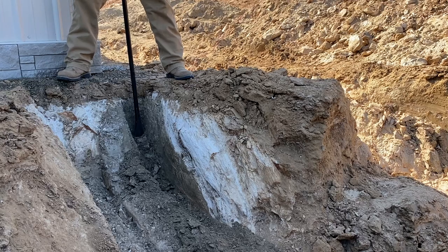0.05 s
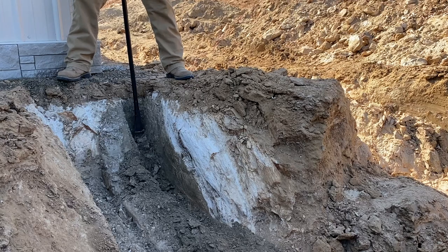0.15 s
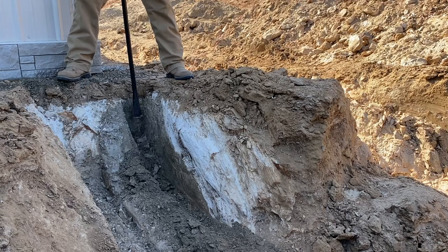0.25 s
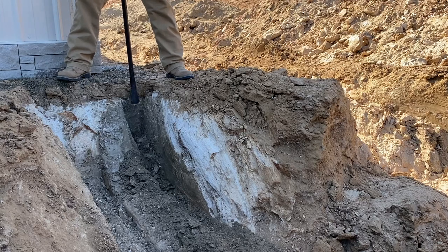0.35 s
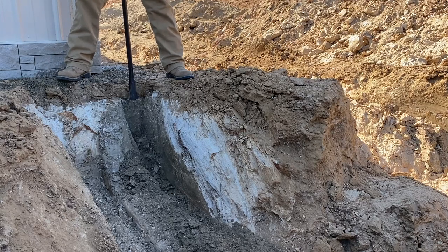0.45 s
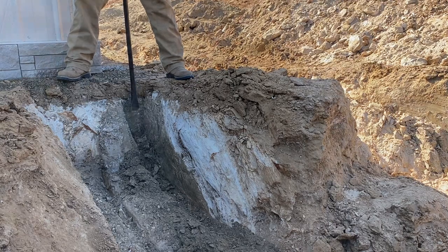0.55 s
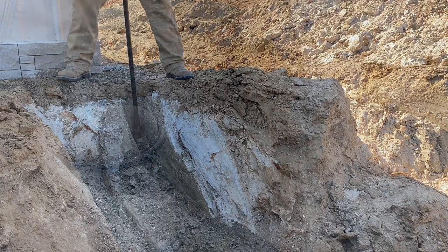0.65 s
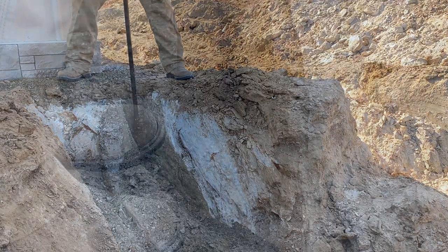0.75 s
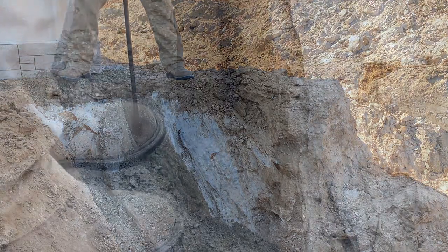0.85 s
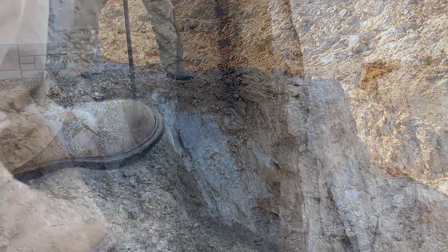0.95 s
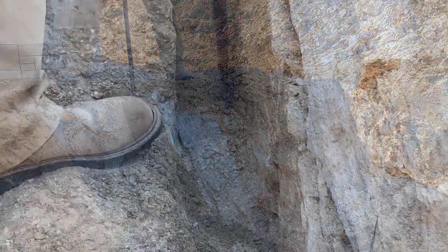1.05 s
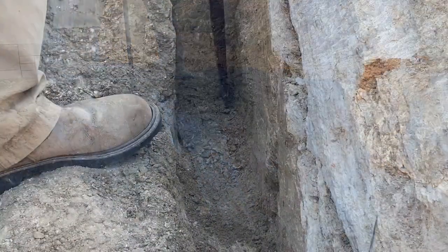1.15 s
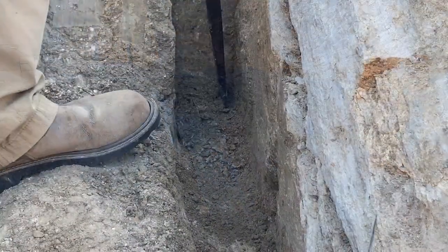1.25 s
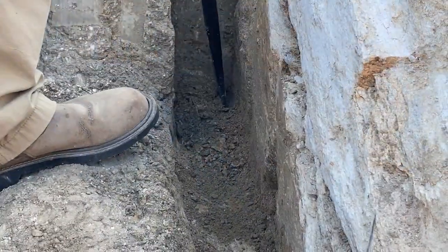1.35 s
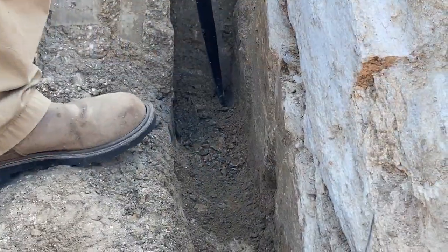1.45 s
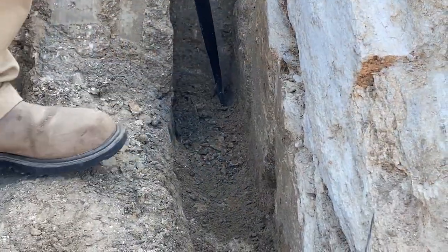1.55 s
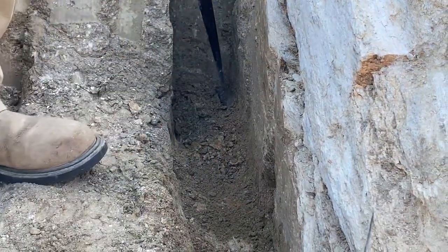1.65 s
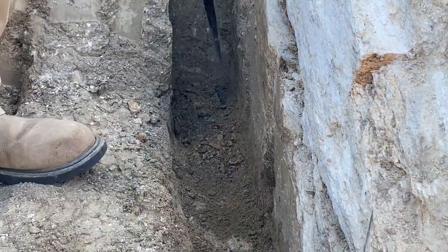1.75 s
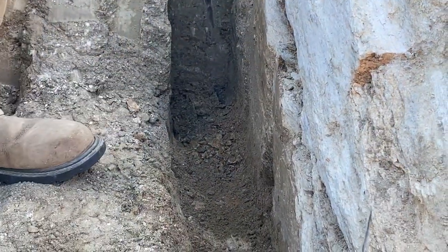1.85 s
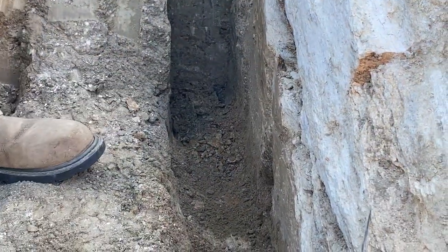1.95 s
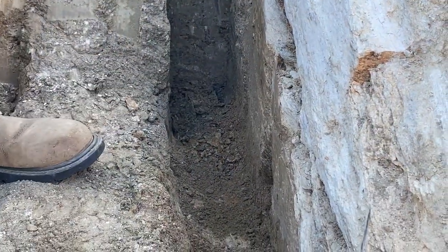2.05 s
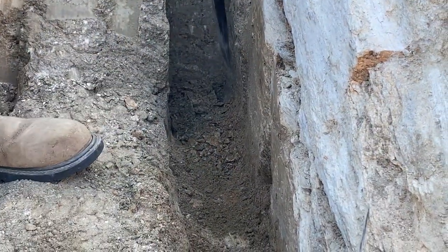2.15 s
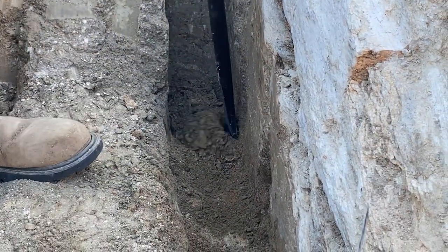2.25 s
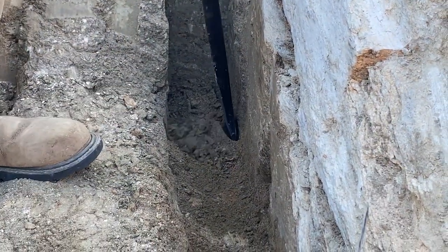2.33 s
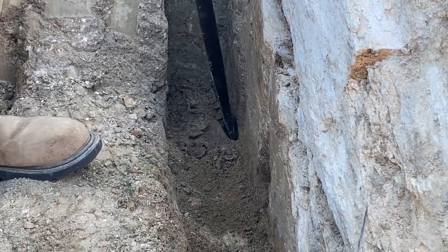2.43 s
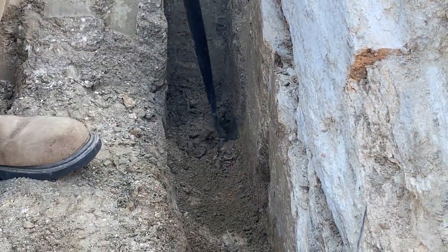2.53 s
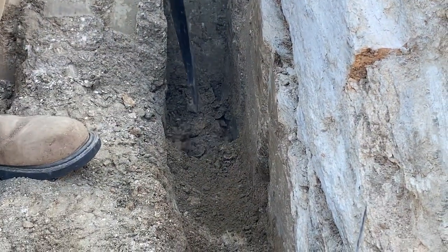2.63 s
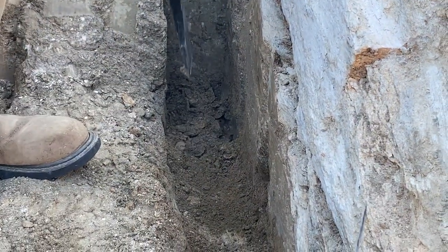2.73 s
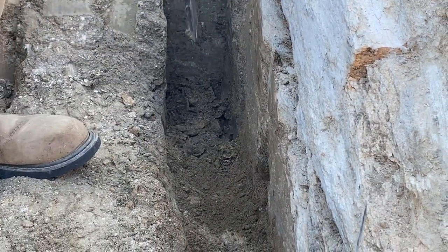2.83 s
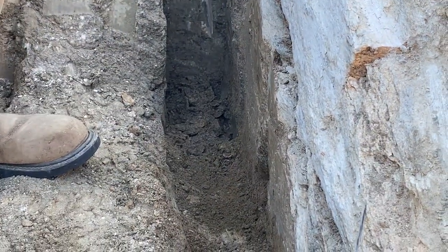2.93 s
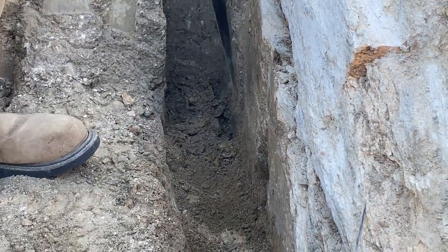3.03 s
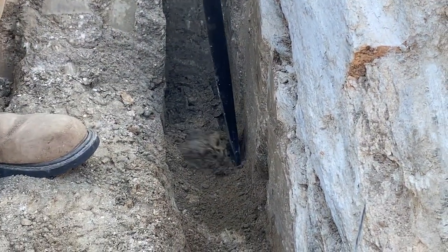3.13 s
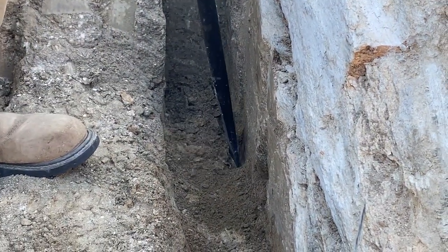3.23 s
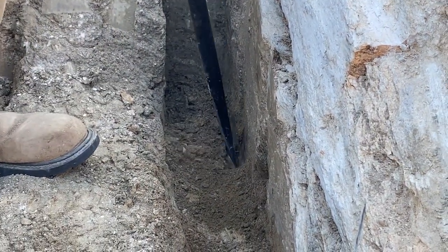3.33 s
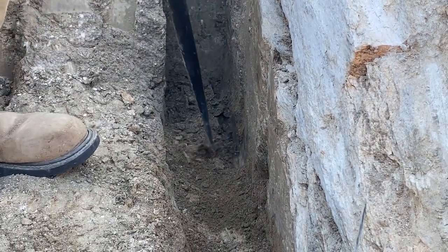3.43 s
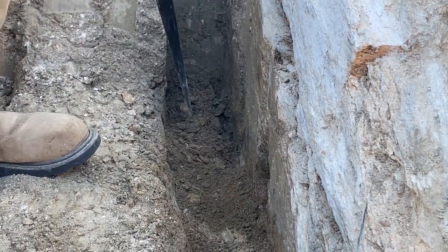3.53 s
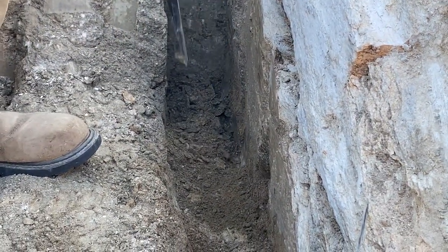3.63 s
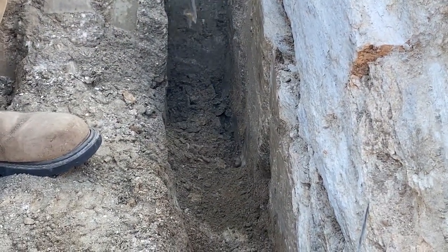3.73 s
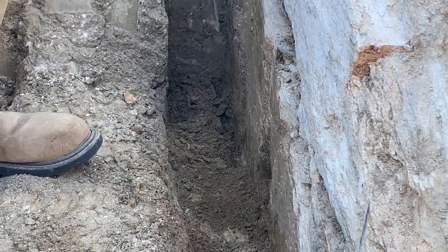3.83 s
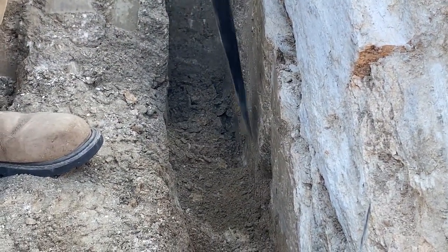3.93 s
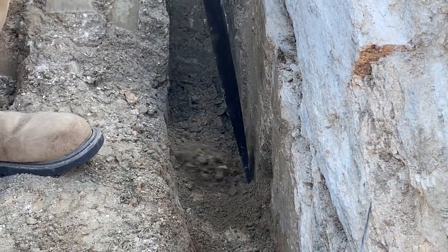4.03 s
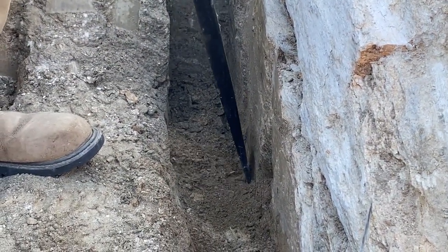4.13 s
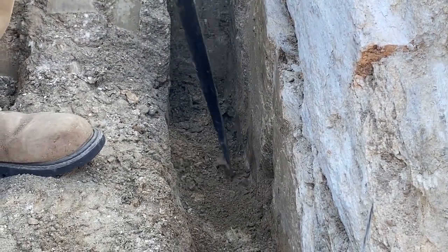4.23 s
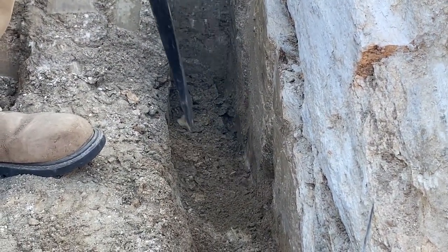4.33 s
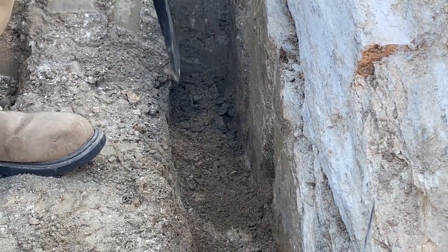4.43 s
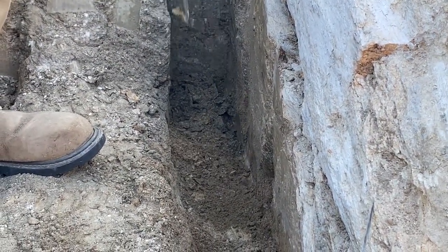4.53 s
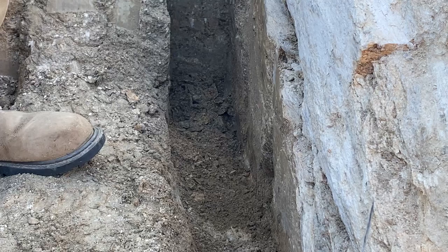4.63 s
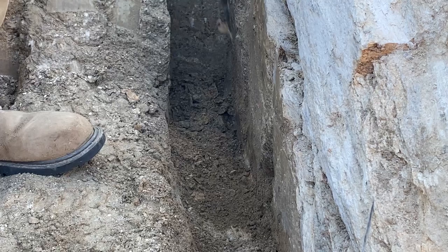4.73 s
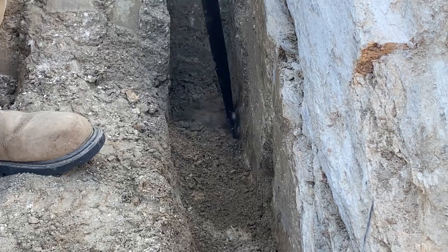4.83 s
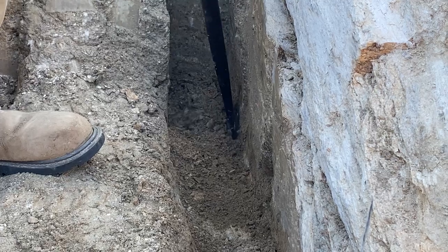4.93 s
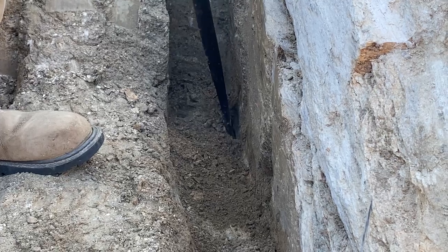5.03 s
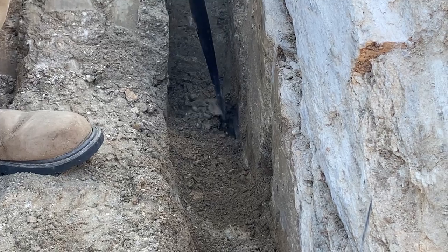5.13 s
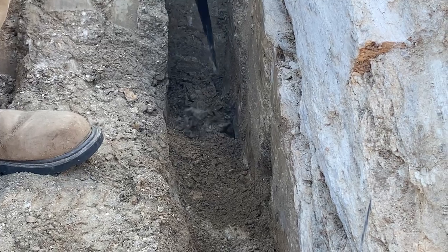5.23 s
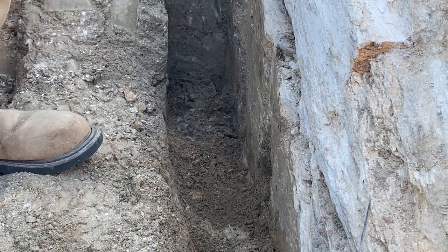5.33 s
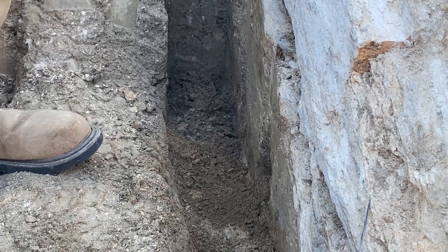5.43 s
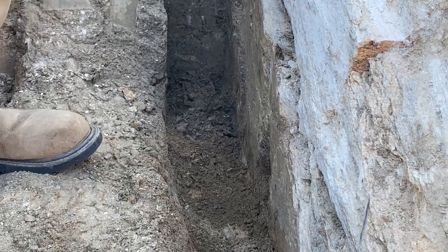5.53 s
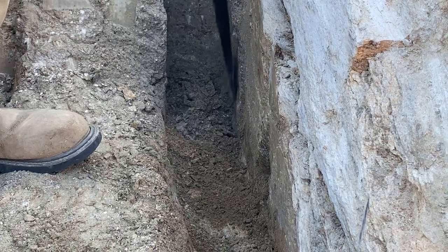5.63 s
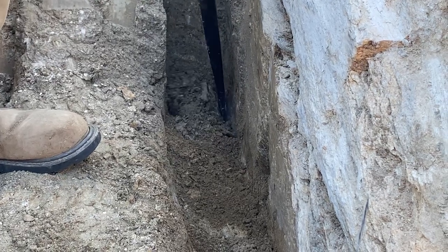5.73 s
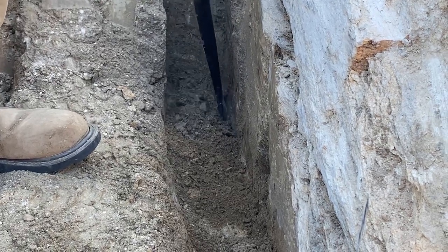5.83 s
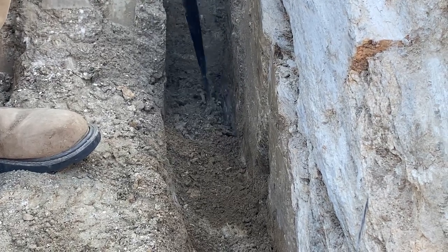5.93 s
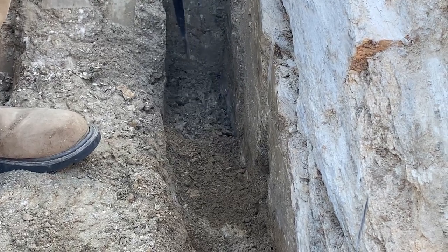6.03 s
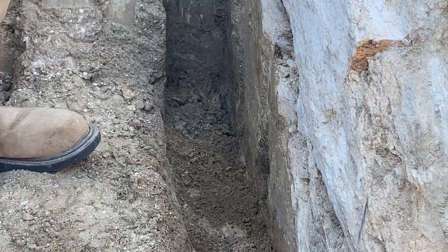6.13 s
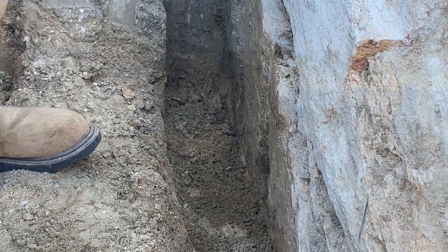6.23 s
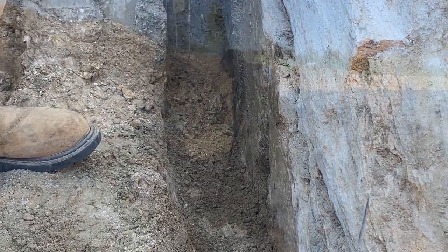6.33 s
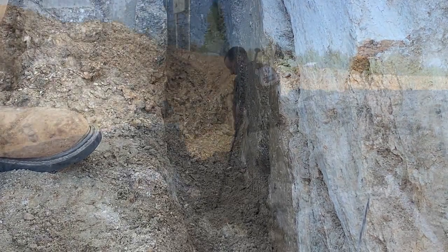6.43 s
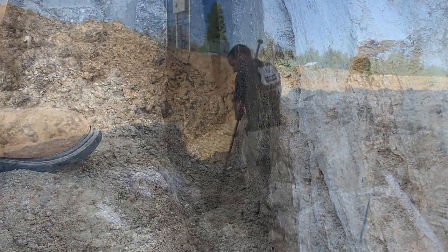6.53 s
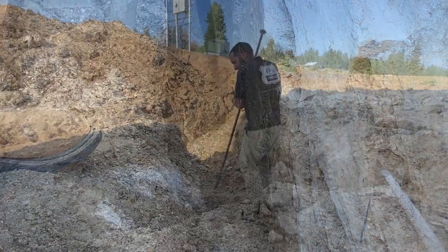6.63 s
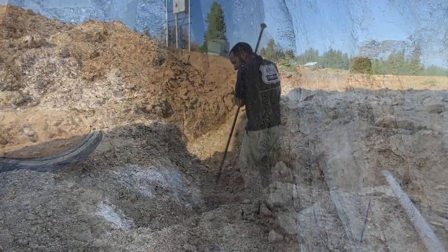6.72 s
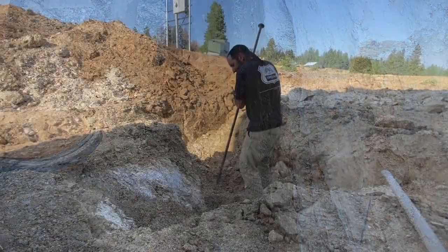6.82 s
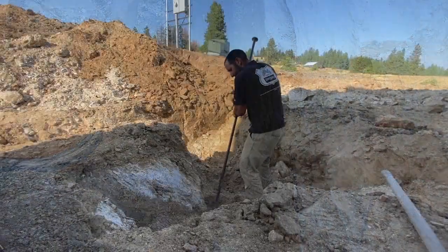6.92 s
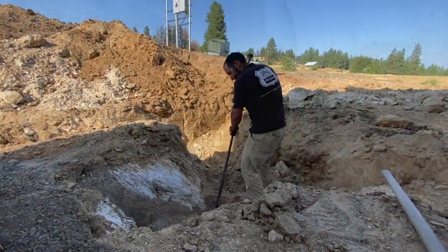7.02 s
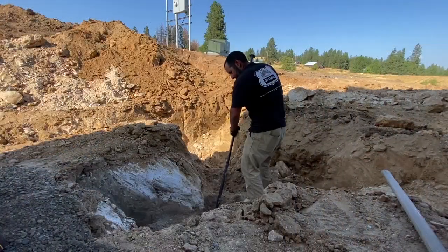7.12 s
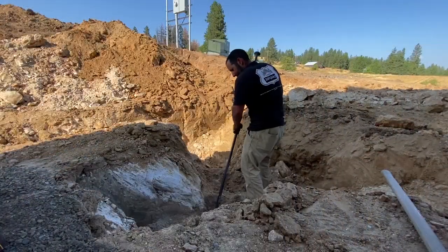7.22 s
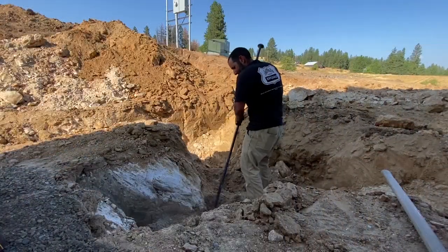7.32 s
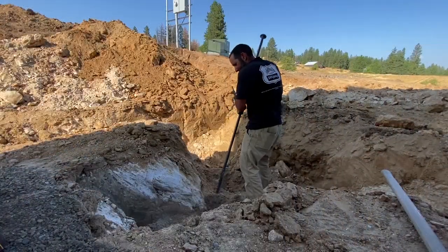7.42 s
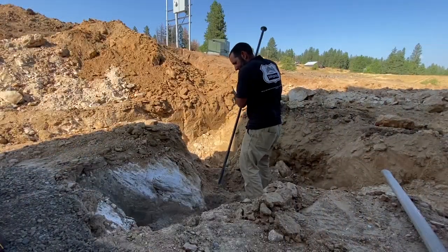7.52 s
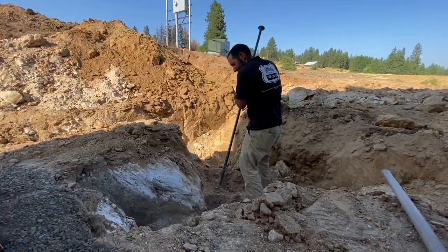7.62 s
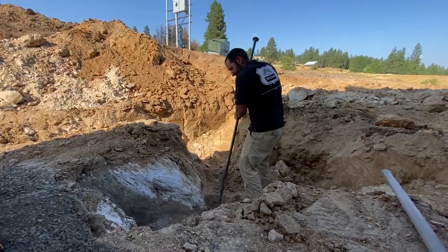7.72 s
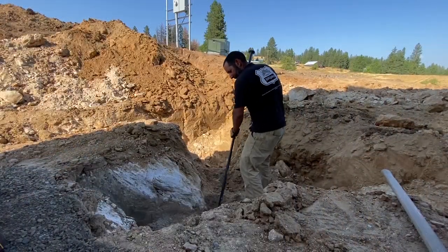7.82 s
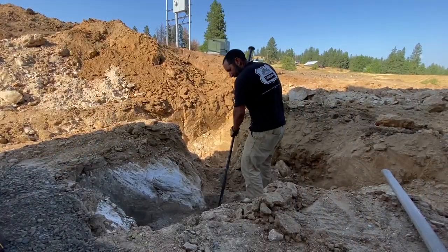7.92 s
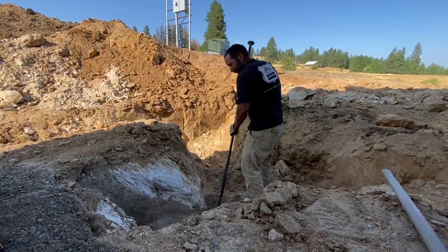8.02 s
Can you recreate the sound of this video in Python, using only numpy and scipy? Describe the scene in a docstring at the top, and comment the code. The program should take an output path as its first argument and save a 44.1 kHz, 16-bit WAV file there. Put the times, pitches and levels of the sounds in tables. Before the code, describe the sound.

Nine slow, hard blows of a heavy metal bar crack stone and thump soil, with brief clinks, falling grit and light wind.

```python
"""In a rocky trench outdoors, a long steel digging bar is driven nine times into the bottom.
Fracture: the tip bites through grit and cracks the stone, each a burst of random grains through a filter.
Resonance: the fractures excite damped bending and lengthwise modes of the bar; the ground thuds and thumps
with falling tones. Filtered grains trickle back as crumbs, over light wind and a faint hush of noise.
The first blow and the last two are heard from a few steps aside, the others from just above the trench."""
import sys
import numpy as np
from scipy import signal
from scipy.fft import rfft, irfft, next_fast_len
from scipy.io import wavfile
from scipy.ndimage import uniform_filter1d

SR = 44100
rng = np.random.default_rng(int(sys.argv[2]) if len(sys.argv) > 2 else 0)


def master_out(mix):
    """Clip the mix to full scale and print it as 16-bit PCM to the path in sys.argv[1]."""
    frames = np.transpose(np.atleast_2d(mix))
    ceiling = np.clip(frames, -1, 1)
    pcm = np.round(ceiling * 32767).astype(np.int16)
    wavfile.write(sys.argv[1], SR, pcm)


N = 355887   # samples in the scene
SIZE = 2 ** 15   # samples in a short sound
AGE = np.arange(SIZE) / SR - .1   # s from the onset of a short sound

# ring that the tip allows: deep in the trench, and at the shallow spots heard from the side
BURIED_T60_S, SHALLOW_T60_S = 0.035, 0.052
RATTLE_T60_S = 0.13   # decay of the force of every rattle
RATTLE_RING_DB, RATTLE_LENGTHWISE_DB = 5, -6.5   # relative to the rattle's crunch

# steel meets stone: (time [s], crack level [dB], rise [s], force t60 [s], brightness [dB/octave],
# bending ring level [dB], lengthwise ring level [dB])
CRACKS = [(0.645, -22.5, 0.0058, 0.022, -0.5, -51.5, -33.5), (2.239, -29, 0.0028, 0.062, -0.5, -48, -52),
          (3.12, -19.5, 0.0023, 0.026, -1, -26, -42), (3.988, -26, 0.0013, 0.028, 1, -31, -50.5),
          (4.829, -23.5, 0.0033, 0.042, 3, -14, -33), (4.846, -25.5, 0.004, 0.037, 1.5, -32.5, -42.5),
          (5.664, -28, 0.00092, 0.03, 7, -18, -37), (5.678, -23.5, 0.0039, 0.036, 0.5, -36.5, -40),
          (6.517, -23, 0.0051, 0.019, 0.5, -28.5, -49.5), (7.015, -20.5, 0.0086, 0.14, -1, -25.5, -43),
          (7.808, -27.5, 0.0012, 0.13, 0, -39, -34)]
# the bar rebounds and rattles on the rock: (time [s], crunch level [dB], rise [s], loose tip's t60 limit [s])
RATTLES = [(0.686, -45, 0.0016, 0.17), (7.086, -46.5, 0.02, 0.1), (7.177, -59.5, 0.011, 1.2),
           (7.26, -64, 0.02, 0.55)]


def bar_on_stone():
    """Impact excitation: the bar cracks the stone; the deeper its tip is buried, the more its ring is damped."""
    out = np.zeros((2, N))
    for s, *blow in CRACKS:
        tip_t60 = BURIED_T60_S + shallow_at(s) * (SHALLOW_T60_S - BURIED_T60_S)
        add(out, s, contact(s, *blow, tip_t60))
    for s, db, rise, tip_t60 in RATTLES:
        ring_db, lengthwise_db = db + RATTLE_RING_DB, db + RATTLE_LENGTHWISE_DB
        add(out, s, contact(s, db, rise, RATTLE_T60_S, 0, ring_db, lengthwise_db, tip_t60))
    return out


SPOIL_DB, SPOIL_T60_S = -17, 0.14   # tail of each crack off the heaps of spoil; gain before filtering
SLAB_HZ, SLAB_T60_S, SLAB_DB = 1400, 0.0018, -3   # hard clack of the bare slab, relative to the crack
SHALLOW_DETUNE = .989   # a tip held less firmly lowers the bending modes

# spectrum of breaking stone: (frequency [Hz], density [dB per Hz])
STONE = [(150, -15.5), (400, 0), (1500, -5.5), (3000, -11), (7200, -19), (8500, -26), (10300, -16.5),
         (11900, -40), (14000, -35.5), (16000, -51)]
# bending modes of the bar: (frequency with the tip deep [Hz], level from above the trench [dB],
# level from the side [dB], t60 with the tip free [s])
BENDING = [(1196, -6, -4, .1), (1803, -9, -3, .07), (2020, -9, 3, .15), (2290, -3, -7, .15),
           (2697, 3, -2, .15), (3043, 0, -12, .15), (3446, 0, -7, .25), (3900, -2, 0, 1.1),
           (4356, -8, -7, .2), (4620, -5, -18, .15), (4790, -4, -12, .2), (4890, -17, -4, .22),
           (5390, -3, -3, .11), (5948, -17, -6, .17), (6243, -14, -6, .15), (6400, -7, -10, .17),
           (9700, -25, -10, .16)]
# lengthwise modes of the bar: (frequency [Hz], level [dB], t60 [s])
LENGTHWISE = [(1412, -2, .11), (2825, 2, .2), (4226, -7, .095), (5635, -5, .1), (7063, -3, .14),
              (9950, -13, .09)]


def contact(s, db, rise, t60, bright_db, ring_db, lengthwise_db, tip_t60):
    """Modal superposition: a burst of fractures drives the bar's modes; the tip damps the bending ones."""
    shallow = shallow_at(s)
    force = grains(SIZE) * swell(rise, t60)
    scatter = from_db(SPOIL_DB) * grains(SIZE) * swell(rise, SPOIL_T60_S)
    crack = crest_one(colour(trench(force, echo_db=-7.0) + scatter, STONE, bright_db))
    slab = crest_one(ring(force, SLAB_HZ, SLAB_T60_S))
    crack = crack + shallow * from_db(SLAB_DB) * slab
    bending = 0
    for hz, above_db, aside_db, free_t60 in BENDING:
        level_db = above_db + shallow * (aside_db - above_db)
        damped_t60 = 1 / (1 / free_t60 + 1 / tip_t60)   # loss rates add
        bending = bending + from_db(level_db) * mode(force, hz * SHALLOW_DETUNE ** shallow, damped_t60)
    lengthwise = sum(from_db(level) * mode(force, hz, decay) for hz, level, decay in LENGTHWISE)
    ringing = from_db(ring_db) * crest_one(bending) + from_db(lengthwise_db) * crest_one(lengthwise)
    return spread(from_db(db) * crack + ringing, off_axis_at(s))


def mode(force, hz, t60):
    """Energy storage: a mode sums the fractures' energy, rings it out, and has its phase jolted by them."""
    push = force[0] / np.sqrt(np.sum(force[0] ** 2))
    energy_kept = from_db(-60 / (t60 * SR)) ** 2   # share kept per sample
    energy = signal.lfilter([1], [1, -energy_kept], push ** 2 + 1e-18)
    phase = 2 * np.pi * (hz * AGE + rng.random((2, 1))) + np.cumsum(push)
    return np.sqrt(energy) * np.sin(phase)


def trench(x, echo_db):
    """Early reflection: the close rock walls throw the sound back three times within a few milliseconds."""
    lags = rng.uniform(.001, 0.004, size=3)   # s
    return x + sum(from_db(echo_db) * np.roll(x, round(lag * SR), axis=-1) for lag in lags)


def squeak(s, hz, db):
    """Frictional excitation: steel skids over stone, noise through two equal resonances in series."""
    out = np.zeros((2, N))
    friction = rng.standard_normal(SIZE) * swell(0.00049, 0.03)
    skid = ring(friction, hz, 0.0072)
    add(out, s, from_db(db) * crest_one(ring(skid, hz, 0.0072)))
    return out


KNOCK_HZ, KNOCK_LEAD_S = 607, .007   # lower knock resonance; the knock comes just before the thud
KNOCK_RISE_S, KNOCK_T60_S = 0.0074, 0.023
THUD_SAG_OCT_PER_S, THUD_NOISE_DB = 65, -2   # pitch drop of the thud; crunch of soil within it
THUMP_LAG_S = 0.0026   # the thump follows the thud
BUMP_RISE_CYCLES, BUMP_T60_CYCLES = 0.81, 3.6   # a bump swells and fades within a few cycles
BUMP_SAG_OCT_PER_S = 2

# the ground stops the bar: (time [s], knock level [dB], thud level [dB], thud pitch at onset [Hz],
# thump level [dB], spilled earth level [dB], spill length [s])
BLOWS = [(0.654, -31, -26.5, 210, -29, -72, 0.96), (2.25, -28, -25, 215, -27.5, -68.5, 0.43),
         (3.132, -21, -30.5, 231, -33, -71.5, 0.73), (4, -21, -25.5, 170, -26, -68, 0.19),
         (4.859, -28.5, -22.5, 224, -28, -63.5, 0.14), (5.685, -24.5, -20, 238.7, -38.5, -68, 0.16),
         (6.525, -22, -27.5, 265.2, -36, -69, 0.026), (7.024, -27.5, -20, 175, -37, -76, 0.18),
         (7.805, -36.5, -28, 199, -35.5, -70.5, 0.27)]
# dull bumps between the blows: (time [s], level [dB], pitch at onset [Hz])
BUMPS = [(0.555, -43, 91), (1.092, -34.5, 103.5), (1.145, -37, 140.7), (1.333, -45, 133.6),
         (1.441, -39.5, 149.3), (2.046, -37, 83.3), (2.417, -37.5, 59.5), (3.555, -31.5, 60.9),
         (3.68, -25, 85.7), (3.71, -28, 59.8), (3.807, -37.5, 67.1), (4.093, -32, 61.3), (4.651, -41, 63),
         (5.371, -30, 64.9), (6.015, -40, 62.06), (6.132, -33, 73.5), (6.231, -41.5, 70),
         (6.315, -38, 71.8)]


def ground():
    """Momentum transfer: stone knocks in its bed, soil stops the bar with a falling thud, the ground thumps."""
    out = np.zeros((2, N))
    for s, knock_db, thud_db, thud_hz, thump_db, _, _ in BLOWS:
        add(out, s - KNOCK_LEAD_S, from_db(knock_db) * spread(stone_knock(), off_axis_at(s)))
        add(out, s, from_db(thud_db) * spread(soil_thud(thud_hz), off_axis_at(s)))
        add(out, s + THUMP_LAG_S, from_db(thump_db) * sway())
    for s, db, hz in BUMPS:
        envelope = swell(BUMP_RISE_CYCLES / hz, BUMP_T60_CYCLES / hz)
        add(out, s, from_db(db) * crest_one(sinking(hz, BUMP_SAG_OCT_PER_S) * envelope))
    return out


def stone_knock():
    """Forced resonance: a push of noise excites two short modes of the stone in its bed."""
    push = rng.standard_normal((2, SIZE)) * swell(KNOCK_RISE_S, KNOCK_T60_S)
    low = rms_one(ring(push, KNOCK_HZ, .016))
    high = rms_one(ring(push, KNOCK_HZ * 1.72, .018))
    knock = low + from_db(-3) * high
    return crest_one(colour(knock, [(200, -14.5), (550, 4.0), (1500, 0), (3000, -21.5)]))


def soil_thud(hz):
    """Frequency glide: packed soil crunches as low noise around a falling tone."""
    push = rng.standard_normal((2, SIZE)) * (swell(.007, .048) + from_db(-32) * swell(.007, .3))
    crunch = crest_one(colour(push, [(45, -27), (150, -2), (300, -0.5), (480, -18.5), (1700, -49)]))
    drop = crest_one(sinking(hz, THUD_SAG_OCT_PER_S) * swell(.008, 0.056))
    return from_db(THUD_NOISE_DB) * crunch + drop * [[1], [0]]   # the tone enters only the shared signal


THUMP_HZ, THUMP_GLIDE_HZ = 52.7, 76   # settled pitch, and the extra pitch at onset
THUMP_RISE_S, THUMP_T60_S = .0088, 0.4
THUMP_BEAT_HZ, THUMP_BEAT_DB = 6.4, -8.5   # a second mode just above makes it throb


def sway():
    """Beating: the ground rocks for a few cycles in two close modes, its pitch gliding down at the onset."""
    hz = THUMP_HZ + THUMP_GLIDE_HZ * np.exp(-np.maximum(AGE, 0) / 0.009)
    first = np.sin(2 * np.pi * np.cumsum(hz * (AGE > 0)) / SR)
    second = np.sin(2 * np.pi * np.cumsum((hz + THUMP_BEAT_HZ) * (AGE > 0)) / SR)
    return crest_one((first + from_db(THUMP_BEAT_DB) * second) * swell(THUMP_RISE_S, THUMP_T60_S))


def sinking(hz, oct_per_s):
    """Frequency glide: a tone that passes through the given pitch at about age 0 on its way down."""
    glide = hz * 2 ** np.clip(-oct_per_s * AGE, -2, 2)
    return np.sin(2 * np.pi * (np.cumsum(glide) / SR + rng.random()))


GRIT_START_DB = -13   # the bite grows from this level, relative to its end, as the tip sinks in
GRIT_TILT_DB = 3.5   # crushed gravel is brighter than stone, per octave

# the tip bites through loose grit: (time [s], length [s], level [dB])
GRIT = [(2.224, 0.013, -43.5), (3.096, 0.018, -40), (3.971, 0.011, -35.5), (4.817, 0.0092, -35),
        (5.647, 0.0094, -32.5), (6.497, 0.011, -50.5)]
# single chips of stone land: (time [s], peak level [dB], brightness [dB/octave])
CHIPS = [(0.32, -48, -4.5), (1.1178, -32, 12), (1.1318, -33.5, 6), (1.7245, -44, -0.5), (2.2, -43.5, 2),
         (5.889, -45, 2), (5.911, -44, 2.5)]


def grit():
    """Granular fracture: gravel is crushed ahead of the stone in a growing burst; loose chips tick as they land."""
    out = np.zeros((2, N))
    for s, length, db in GRIT:
        bite = np.interp(AGE, [0, .001, length, length + 0.015], [0, from_db(GRIT_START_DB), 1, 0])
        crushed = crest_one(colour(grains(SIZE) * bite, STONE, tilt_db=GRIT_TILT_DB))
        add(out, s, from_db(db) * spread(crushed))
    for s, db, bright_db in CHIPS:
        tick = spread(colour(grains(SIZE) * swell(0.00058, 0.03), CRUMBS, bright_db))
        add(out, s, from_db(db) * tick / np.abs(tick).max())
    return out


SPILL_DELAY_S = 0.072   # earth runs back once the bar is pulled out
FLURRY_DB = 2.5   # random swing of the falling crumbs
PEBBLES_DB = -7   # larger grains, relative to the crumbs
FIZZ_DB, FIZZ_TILT_DB = -4, 11   # brighter crumbs heard fully from the side; tilt per octave

# spectrum of falling crumbs: (frequency [Hz], density [dB per Hz])
CRUMBS = [(120, -21), (250, -0.5), (1500, -10), (2700, -4.5), (3600, -13.5), (6800, -11.5), (8570, -21.5),
          (10300, -10.5), (12300, -29.5), (16000, -31.5)]
# clods slump and boots scuff: (time [s], level [dB], rise [s], t60 [s], spilled earth level [dB],
# spill length [s])
SCUFFS = [(0.08, -87, 0.031, 0.37, -72, 1), (0.704, -39.5, 0.0067, 0.087, -93.5, 0.046),
          (1.084, -44, 0.0045, 0.31, -62, 0.0066), (1.31, -46.5, 0.0043, 0.77, -65, 0.55)]


def loose_earth():
    """Granular flow: blows and scuffs spill crumbs and pebbles, which trickle back in small uneven flurries."""
    flow = sum(spill(s + SPILL_DELAY_S, db, length) for s, *_, db, length in BLOWS)
    flow = flow + sum(spill(s, db, length) for s, *_, db, length in SCUFFS)
    falling = grains(N) * from_db(FLURRY_DB * wander(0.016))
    crumbs = rms_one(colour(falling, CRUMBS))
    fizz = rms_one(colour(grains(N), CRUMBS, FIZZ_TILT_DB))
    fizz = from_db(FIZZ_DB) * off_axis_at(np.arange(N) / SR) * fizz
    out = np.sqrt(flow) * spread(crumbs + from_db(PEBBLES_DB) * pebbles() + fizz)
    for s, db, rise, t60, _, _ in SCUFFS:
        rub = grains(SIZE) * swell(rise, t60)
        scuff = colour(rub, [(70, -7), (150, 8.5), (300, -3.5), (800, -5.5), (2200, -30.5)])
        add(out, s, from_db(db) * spread(crest_one(scuff)))
    return out


SPILL_RISE_S = 0.025
SPILL_SAG_DB_PER_S, SPILL_STOP_DB_PER_S = 9, 116   # thinning while it runs; further fall once it stops
SETTLE_DB, SETTLE_DB_PER_S = -6.5, 22.5   # stragglers relative to the spill, and their fall


def spill(s, db, length):
    """Addition of power: a spill swells, thins while it runs and stops, with stragglers that die away steadily."""
    age = np.arange(N) / SR - s
    onset_db = -9 * np.clip(age / SPILL_RISE_S, -5, 0) ** 2
    age = np.maximum(age, 0)
    run_db = -SPILL_SAG_DB_PER_S * age - SPILL_STOP_DB_PER_S * np.maximum(age - length, 0)
    settle_db = SETTLE_DB - SETTLE_DB_PER_S * age
    return from_db(db + onset_db) ** 2 * (from_db(run_db) ** 2 + from_db(settle_db) ** 2)


PEBBLES_PER_S, PEBBLE_CYCLES = 130, 12   # landings, and the t60 of each in cycles of its own pitch


def pebbles():
    """Size and pitch: clods knock and small stones tick at random, each size a resonance of its own."""
    pitches = np.geomspace(350, 7000, num=14)   # Hz
    lands = rng.standard_normal((2, N)) * (rng.random(N) < PEBBLES_PER_S / SR)
    dealt = rng.integers(0, len(pitches), N)   # which size lands
    out = np.zeros((2, N))
    for k, hz in enumerate(pitches):
        out += rms_one(ring(lands * (dealt == k), hz, PEBBLE_CYCLES / hz))
    return rms_one(out)


GUST_DB = 5   # random swing of the wind

# light wind: (time [s], level about which the gusts swing [dB])
WIND = [(0, -53), (1.701, -68.5), (2.301, -42.5), (2.9, -75), (3.55, -55), (4.8, -64.5), (6.2, -60.5),
        (6.95, -70.5), (7.42, -55), (7.65, -67)]
# spectrum of the wind's rumble: (frequency [Hz], density [dB per Hz])
RUMBLE = [(25, -32.5), (50, 3.5), (100, -2), (170, -16), (600, -76.5)]


def wind():
    """Turbulence: light wind is low-pitched noise whose level swings in small gusts."""
    wind_db = np.interp(np.arange(N) / SR, *np.transpose(WIND)) + GUST_DB * wander(0.095)
    return from_db(wind_db) * spread(rms_one(colour(rng.standard_normal((2, N)), RUMBLE)))


# spectrum of the outdoor hush: (frequency [Hz], density [dB per Hz])
AIR = [(200, -4), (1600, -21.5), (4050, -30), (4630, -21), (5500, -29), (15000, -48)]


def outdoor_hush():
    """Stationary noise: a faint steady hush with a fixed spectrum."""
    return from_db(-72.0) * spread(rms_one(colour(rng.standard_normal((2, N)), AIR)))


# where the bar stands: (time [s], off axis [0-1])
OFF_AXIS = [(0.7, 0.56), (1.3, 0), (6.6, 0), (6.9, 1)]


def off_axis_at(s):
    """Source direction: how far to the side the bar stands."""
    return np.clip(np.interp(s, *np.transpose(OFF_AXIS)), 0, 1)


def shallow_at(s):
    """Boundary condition: 0 deep in the trench, 1 at the shallow spots heard from the side."""
    return min(2 * off_axis_at(s), 1)


RIGHT_LAG_S = .0005   # the right side hears a fully off-axis sound this much later

# stereo coherence near the trench: (frequency [Hz], left-right likeness [-1 to 1])
LIKENESS = [(250, 0.83), (700, 0.71), (3000, 0.82), (6500, 0.98), (10500, 0.094)]


def spread(pair, off_axis=0):
    """Stereo coherence: two signals become left and right; off axis, right is late, weaker, less alike."""
    size = next_fast_len(pair.shape[-1], True)
    hz = np.maximum(np.fft.rfftfreq(size, 1 / SR), 1)
    off = np.clip(off_axis, 0, 1)
    alike = np.clip(at_hz(LIKENESS, hz), -1, 1) / (1 + (off * hz / 1500) ** 2)
    mid, side = rfft(pair, size) * np.sqrt([1 + alike, 1 - alike]) / np.sqrt(2)
    delay = np.exp(-2j * np.pi * hz * RIGHT_LAG_S * off ** 2)
    weaker = from_db(-4 * off * hz / (hz + 1500))   # the treble is weakened most
    return irfft(np.array([mid + side, (mid - side) * delay * weaker]), size)[:, :pair.shape[-1]]


def grains(size):
    """Shot noise: two dense random trains of tiny fractures of uneven size."""
    sizes = from_db(3.2 * np.minimum(rng.exponential(1, (2, size)), 4))
    born = rng.random((2, size)) < 9000 / SR   # 9000 a second
    return rms_one(sizes * born * rng.choice([-1, 1], (2, size)))


def swell(rise, t60):
    """Exponential decay: force builds up to age 0, then falls 60 dB in each t60."""
    level_db = np.where(AGE < 0, -9 * (AGE / rise) ** 2, -60 * AGE / t60)
    return from_db(np.maximum(level_db, -200))


def ring(drive, hz, t60):
    """Damped oscillation: one two-pole resonance."""
    r = from_db(-60 / (t60 * SR))
    return signal.lfilter([1, 0, -1], [1, -2 * r * np.cos(2 * np.pi * hz / SR), r * r], drive + 1e-18)


def colour(x, spectrum, tilt_db=0):
    """Minimum phase: a causal filter with the given spectrum, tilted about 3 kHz by dB per octave."""
    size = next_fast_len(x.shape[-1] // 2 + 1) * 2
    hz = np.maximum(np.fft.rfftfreq(size, 1 / SR), 1)
    response_db = at_hz(spectrum, hz) + tilt_db * np.log2(np.maximum(hz, 500) / 3000)
    cepstrum = irfft(np.log(from_db(response_db)))
    cepstrum[1:size // 2] *= 2   # fold the cepstrum to positive times
    cepstrum[size // 2 + 1:] = 0
    return irfft(rfft(x, size) * np.exp(rfft(cepstrum)))[..., :x.shape[-1]]


def wander(seconds):
    """Random modulation: noise smoothed over the given time, scaled to rms 1."""
    return rms_one(uniform_filter1d(rng.standard_normal(N), size=max(round(seconds * SR), 1)))


def from_db(db):
    """Logarithmic level: decibels to gain."""
    return 10 ** (np.asarray(db) / 20)


def rms_one(x):
    """Mean power: scale to rms 1."""
    return x / np.sqrt(np.mean(x ** 2) + 1e-20)


def crest_one(x):
    """Short-time power: scale so that the loudest 5 ms have rms 1."""
    power = np.mean(np.atleast_2d(x) ** 2, axis=0)
    return x / np.sqrt(uniform_filter1d(power, size=220).max() + 1e-20)


def at_hz(points, hz):
    """Logarithmic pitch: read a table on a log-frequency axis."""
    table_hz, values = np.transpose(points)
    return np.interp(np.log(hz), np.log(table_hz), values)


def add(out, s, sound):
    """Superposition: mix in a short sound whose age 0 falls at time s."""
    start = round((s + AGE[0]) * SR)
    a, b = max(start, 0), min(start + SIZE, N)
    out[:, a:b] += sound[..., a - start:b - start]


def scene():
    """Superposition: the digging, with a shrill skid on the fifth blow, over wind and a faint outdoor hush."""
    digging = bar_on_stone() + squeak(s=4.830, hz=10400, db=-19.0) + ground() + grit() + loose_earth()
    return digging + wind() + outdoor_hush()


def record(dry):
    """Band limiting: a steep elliptic low-pass cuts the top above 15.9 kHz."""
    low_pass = signal.ellip(10, .2, 80, 15900, fs=SR, output="sos")
    return signal.sosfilt(low_pass, dry)


dry = scene()
out = record(dry)
master_out(out)
```